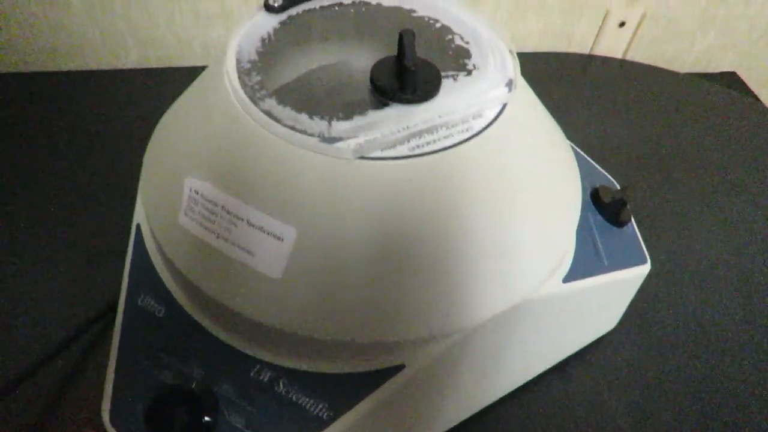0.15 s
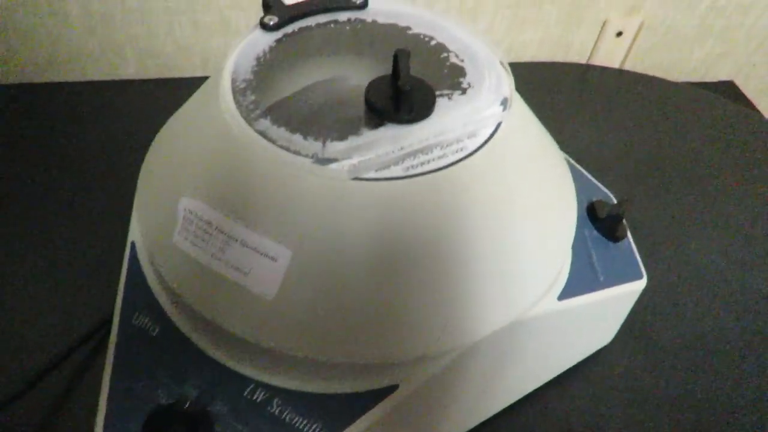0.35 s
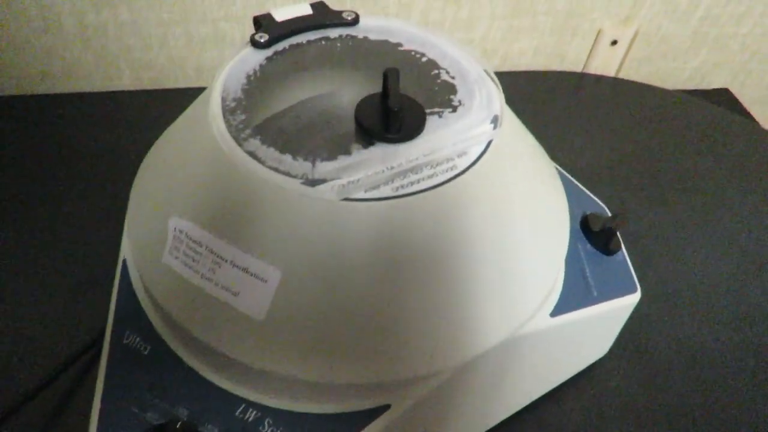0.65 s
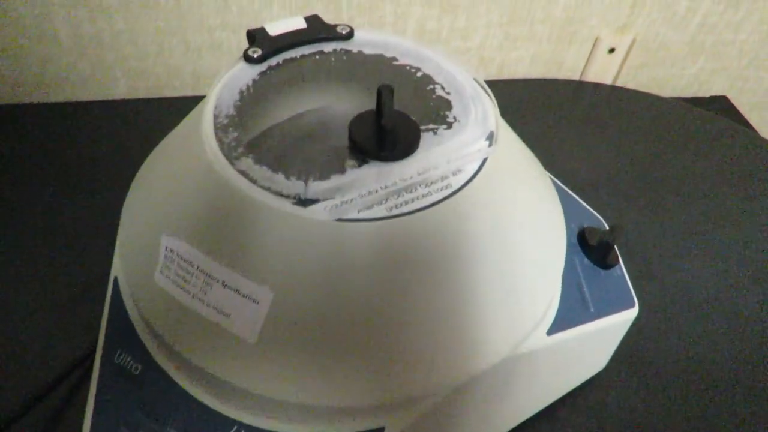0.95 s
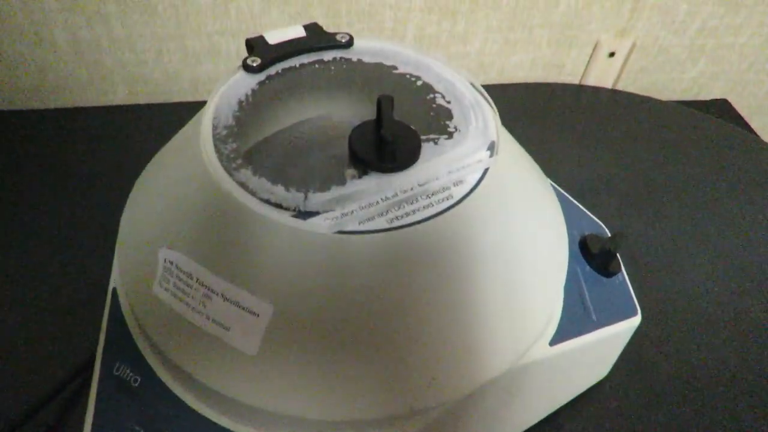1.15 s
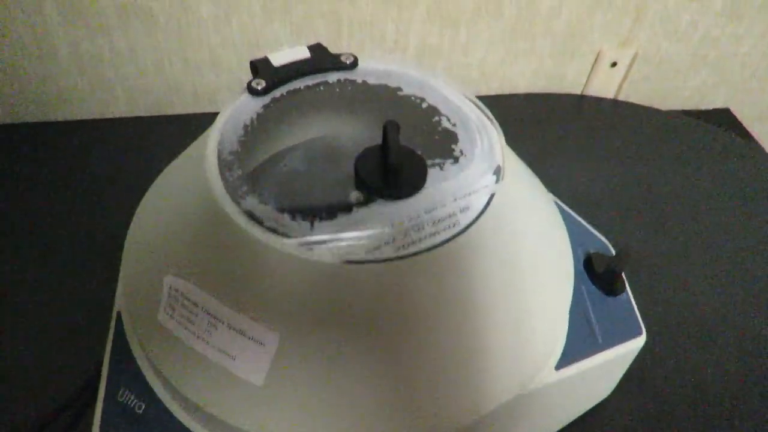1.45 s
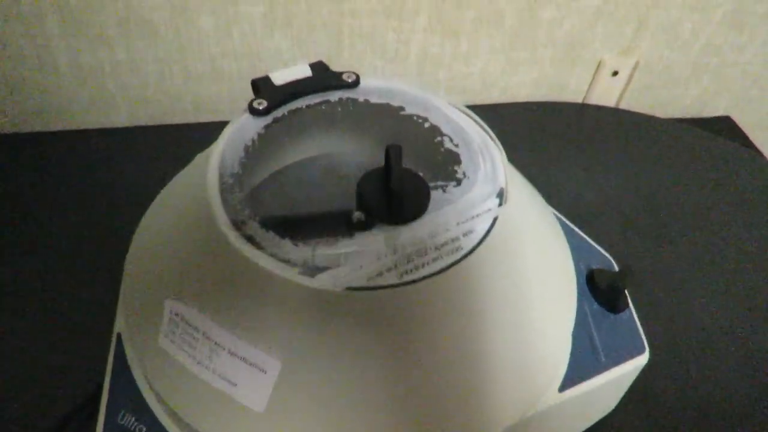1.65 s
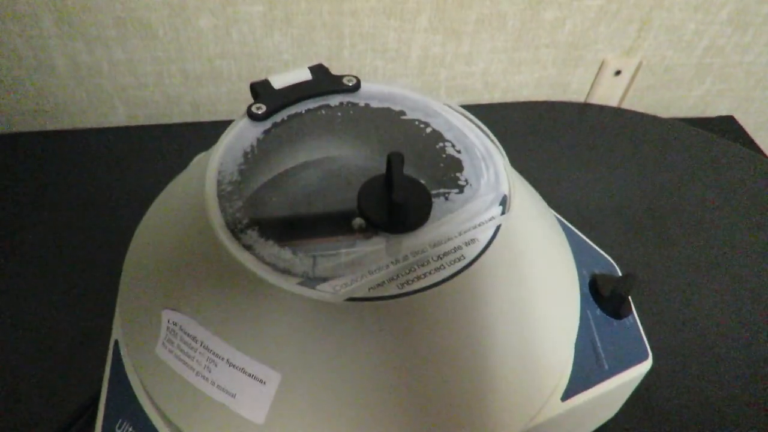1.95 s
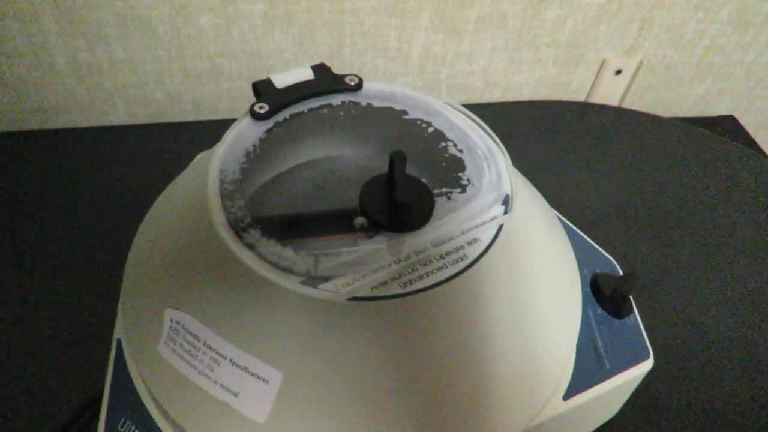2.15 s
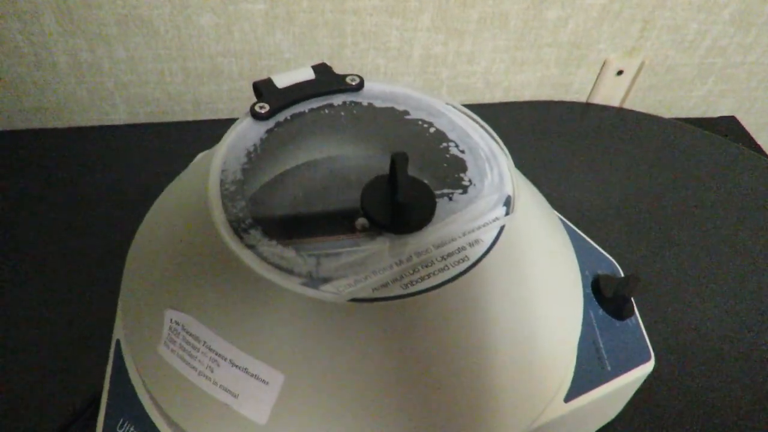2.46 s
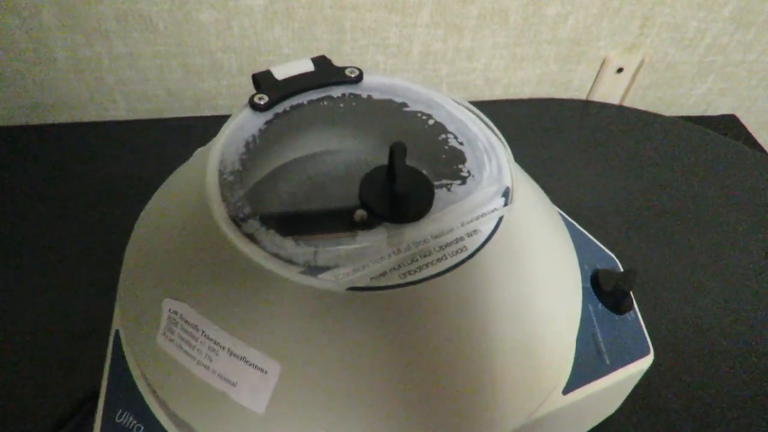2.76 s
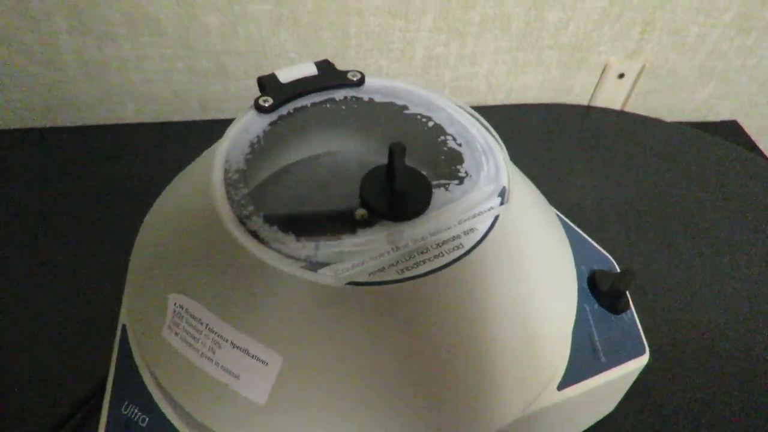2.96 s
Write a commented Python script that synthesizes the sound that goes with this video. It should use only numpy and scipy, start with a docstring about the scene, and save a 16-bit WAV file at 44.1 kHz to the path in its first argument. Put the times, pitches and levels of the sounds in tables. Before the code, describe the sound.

A small centrifuge runs steadily on a table indoors, low hum and rushing air with thin high whines; its clockwork timer ticks about four times a second while the close camera's lens drive clicks in irregular bursts.

```python
"""Indoors, on a table: a small benchtop centrifuge runs with a steady hum, air rushing in its plastic
housing (shaped noise) and thin whines (sines). Its clockwork timer goes tick-tock: struck modes and a
rattle of noise. A camera's lens drive clicks: short struck modes.
Two channels: left is alike + opposed, right is alike - opposed. The bass is mostly alike; the high
treble is mostly opposed."""
import sys
import numpy as np
from scipy import signal
from scipy.fft import rfft, irfft
from scipy.io import wavfile
from scipy.ndimage import uniform_filter1d

SR = 44100
rng = np.random.default_rng(int(sys.argv[2]) if len(sys.argv) > 2 else 0)


def wav_out(sig):
    """Save sig, one row per channel (or a flat mono array), as 16-bit PCM at SR to the path in sys.argv[1]."""
    wavfile.write(sys.argv[1], SR, np.round(np.clip(np.atleast_2d(sig).T, -1, 1) * 32767).astype(np.int16))


N = 136710


def gain_of(db):
    """Amplitude factor of a level in dB."""
    return 10 ** (np.asarray(db) / 20)


def evened(x):
    """Scales to rms 1."""
    return x / np.sqrt(np.mean(x ** 2) + 1e-20)


def read(points, hz, column=1):
    """Reads a column of a spectrum on a log-frequency axis."""
    p = np.transpose(points)
    return np.interp(np.log(hz + 1), np.log(p[0] + 1), p[column])


def add(mix, start_s, sound):
    """Adds a sound into the mix, cut at the end."""
    part = mix[:, round(start_s * SR):][:, :sound.shape[1]]
    part += sound[:, :part.shape[1]]


def drift(top_hz):
    """Slow random wander of rms 1: sixteen sines up to top_hz, weaker as they quicken."""
    t = np.arange(0, N, 256) / SR
    slow = np.zeros(len(t))
    for hz in np.geomspace(top_hz / 20, top_hz, num=16):
        slow += np.sin(2 * np.pi * (hz * t + rng.random())) / np.sqrt(hz)
    return np.interp(np.arange(N) / SR, t, evened(slow))


def tone(hz, rms_db):
    """Sine of fixed or gliding pitch, with a random starting phase."""
    cycles = np.cumsum(hz * np.ones(N)) / SR + rng.random()
    return np.sqrt(2) * gain_of(rms_db) * np.sin(2 * np.pi * cycles)


RING_SAMPLES = 5000
STRIKE_S, MODE_SPREAD_DB = .0008, 2.5  # no two blows excite the modes alike


def ring(hz, t60_s, lag_s, alike_db, opposed_db):
    """A struck mode: soft start, exponential decay; the opposed part has its own phase."""
    t = np.maximum(np.arange(RING_SAMPLES) / SR - lag_s, 0)
    cycles = hz * t + rng.random((2, 1))
    start = 1 - np.exp(-(t / STRIKE_S) ** 2)
    level_db = np.array([[alike_db], [opposed_db]]) + MODE_SPREAD_DB * rng.standard_normal()
    return start * gain_of(level_db - 60 * t / t60_s) * np.sin(2 * np.pi * cycles)


# Air and motor noise, alike part. Each row: frequency in Hz, relative density in dB per Hz.
RUSH_ALIKE = [(76, -18), (130, -5), (201, -11.5), (260, -12), (374, -17.5), (482, -16), (669, -23.5),
              (789, -19), (864, -24), (1090, -24), (1760, -29), (2110, -29), (6520, -48), (8880, -57.5),
              (10100, -65.5), (13100, -101), (22000, -120)]
# The same noise, opposed part. Each row: frequency in Hz, relative density in dB per Hz.
RUSH_OPPOSED = [(35, -52.5), (60, -18), (85, -14), (109, -7), (320, -1.5), (422, -2), (546, -8.5),
                (875, -12), (1810, -18.5), (2300, -14.5), (2910, -23), (4280, -27), (6570, -33.5),
                (8200, -35.5), (10100, -31.5), (11500, -35.5), (12500, -35.5), (14200, -45), (15000, -63)]
# Resonances and dips of housing and table. Each row: frequency in Hz, width in Hz, lift in dB.
HOUSING_MODES = [(60.1, 8, 19.5), (73, 5, 13), (101, 34, -5.5), (145.6, 6.1, 7.5), (251.5, 8.6, 5),
                 (269.6, 12, 4), (322, 20, 4.5), (424.7, 24, 5), (485.7, 11, 7), (568, 25, 5.5),
                 (636, 12, 3.5), (754, 26, 1.5), (781, 39, 5), (890, 19, 3.5), (1103, 36, 4),
                 (2040, 160, 1)]
# Band louder in the left channel. One row: centre in Hz, width in octaves, share of the alike part.
LEFT_BAND = (330, .5, .06)
# Treble level, used about its mean. Each row: time in seconds, level in dB.
TREBLE_LEVEL = [(0.0, -60.5), (1.6, -63), (1.7, -62.5), (2.43, -63), (2.55, -60), (3.1, -63)]
# Growth of the rush from start to end. Each row: frequency in Hz, growth in dB.
RUSH_GROWTH = [(100, 2.5), (250, 0), (500, 1.5), (1200, 1.5), (3000, -0.5), (6000, 1.5)]
RUSH_ALIKE_DB, RUSH_OPPOSED_DB = -31, -47.5
RUMBLE_EDGE_HZ, TREBLE_EDGE_HZ = 39.7, 3500
PATCHY_RMS_DB, SWELL_RMS_DB, SWELL_TOP_HZ = 0.91, 0.91, 1.5


def rush():
    """Noise shaped by housing resonances, with faint time-frequency patches and a slow swell."""
    hz = np.fft.rfftfreq(N, 1 / SR)
    lift_db = sum(db / (1 + (2 * (hz - f) / width) ** 2) for f, width, db in HOUSING_MODES)
    low_cut = 1 / np.sqrt(1 + (RUMBLE_EDGE_HZ / (hz + 1)) ** 10)
    white = rfft(rng.standard_normal((2, N))) * low_cut
    alike = evened(irfft(white[0] * gain_of(read(RUSH_ALIKE, hz) + lift_db), N)) * gain_of(RUSH_ALIKE_DB)
    opposed = evened(irfft(white[1] * gain_of(read(RUSH_OPPOSED, hz)), N)) * gain_of(RUSH_OPPOSED_DB)

    centre_hz, width_octaves, share = LEFT_BAND
    lean = share * np.exp(-(np.log2((hz + 1) / centre_hz) / width_octaves) ** 2)
    opposed = opposed + irfft(rfft(alike) * lean, N)

    f, t, spectra = signal.stft([alike, opposed], SR, nperseg=1024)
    patches = uniform_filter1d(rng.standard_normal(spectra.shape[1:]), size=12, axis=0)
    patches = evened(uniform_filter1d(patches, size=5, axis=1))
    at_s, treble_db = np.transpose(TREBLE_LEVEL)
    treble_weight = 1 / (1 + (TREBLE_EDGE_HZ / (f + 1)) ** 4)
    change_db = np.outer(treble_weight, np.interp(t, at_s, treble_db - treble_db.mean()))
    change_db = change_db + PATCHY_RMS_DB * patches
    change_db = change_db + read(RUSH_GROWTH, f)[:, None] * (t * SR / N - .5)
    shaped = signal.istft(spectra * gain_of(change_db), SR, nperseg=1024)[1][:, :N]
    return shaped * gain_of(SWELL_RMS_DB * drift(SWELL_TOP_HZ))


# Lens drive clicks. Each row: time in seconds, level in dB.
LENS_CLICKS = [(0.0104, -32.5), (0.0443, -34), (0.0777, -34.5), (0.1112, -33.5), (0.1464, -42),
               (0.3112, -36), (0.3456, -36), (0.3804, -42), (0.4778, -31.5), (0.5117, -35), (0.545, -34),
               (0.7113, -32), (0.7437, -32), (0.7784, -29), (0.8154, -44), (0.9258, -47), (0.9737, -34),
               (1.4122, -33), (1.5424, -30), (1.6112, -35), (1.6781, -38), (1.944, -33), (2.0118, -36),
               (2.0787, -33), (2.5475, -31.5), (2.6134, -33.5), (2.6803, -32.5), (2.8165, -38),
               (2.879, -32), (2.9472, -30.5)]
# Modes of a click. Each row: nominal frequency in Hz, relative alike level in dB, relative opposed in dB.
LENS_MODES = [(3840, -6, -19), (4310, -0.5, -16.5), (4670, -0.5, -15), (5150, -2.5, -14), (5660, -11, -21),
              (2000, 0, -13), (2240, 0.5, -22), (2800, -4, -18), (3320, -10, -20), (1225, -4, -16.5)]
LENS_T60_CYCLES, LENS_LEAD_S, LENS_SMEAR_S = 34, .0012, .002  # modes start within the smear


def lens():
    """Short dull snaps inside the camera: modes that all die in the same number of nominal cycles."""
    out = np.zeros((2, N))
    for time_s, db in LENS_CLICKS:
        click = np.zeros((2, RING_SAMPLES))
        for f, alike_db, opposed_db in LENS_MODES:
            mode_hz, lag_s = f * rng.uniform(.95, 1.05), LENS_SMEAR_S * rng.random()
            click += ring(mode_hz, LENS_T60_CYCLES / f, lag_s, alike_db, opposed_db)
        add(out, time_s - LENS_LEAD_S, gain_of(db) * click)
    return out


# Escapement beats, tick and tock in turn. Each row: start in seconds, level in dB.
BEATS = [(0.1705, -44.5), (0.4406, -42.5), (0.6779, -43), (0.951, -44), (1.1882, -44.5), (1.4596, -42.5),
         (1.6945, -44.5), (1.9668, -43), (2.204, -44), (2.4762, -40.5), (2.7187, -45.5), (2.9868, -41)]
# Modes of the clockwork. Each row: nominal frequency in Hz, relative tick level in dB, relative tock
# level in dB, opposed level re alike in dB, longest t60 in seconds.
CLOCKWORK_MODES = [(2590, -9, 2.5, -18, .035), (3565, -11, -3.5, -17, 0.054), (4360, -3.5, -2, -16, 0.061),
                   (5214, -3.5, 0.5, -16, 0.051), (5840, -14, -14, -16, 0.036),
                   (6490, -8, -11.5, -13, 0.056), (7070, -12.5, -8, -9, 0.063),
                   (8090, -15.5, -10, -10.5, 0.052), (8400, -20, -17, -9.5, 0.039),
                   (9570, -11.5, -16.5, -3, 0.051)]
# Impacts within one beat. Each row: nominal lag in seconds, relative level in dB.
IMPACTS = [(0, 7), (.005, 1), (0.012, 1.5)]
# Rattle in the case. Each row: frequency in Hz, relative alike level in dB, relative opposed in dB.
RATTLE_SPECTRUM = [(2500, -13, -20.5), (4420, -2, -17), (7000, -6.5, -13), (9000, -8.5, -7.5),
                   (10100, -10, 4.5), (10500, -19, -10.5), (11900, -16, -10), (13500, -21, -21),
                   (15000, -38.5, -38.5)]
RATTLE_DB, RAGGED_RMS_DB, SECOND_BEAT_TOP_DB = 1.5, 3, 7
RATTLE_RISE_S, RATTLE_T60_S, TOP_T60_S = 0.0033, 0.15, 0.075  # the top of the rattle dies sooner


def timer():
    """Beats of quick impacts on modes and a ragged rattle, with more above 10.1 kHz on every second beat."""
    out = np.zeros((2, N))
    t, hz = np.arange(RING_SAMPLES) / SR, np.fft.rfftfreq(RING_SAMPLES, 1 / SR)
    rise = 1 - np.exp(-t / RATTLE_RISE_S)
    body_decay = rise * gain_of(-60 * t / RATTLE_T60_S)
    top_decay = rise * gain_of(-60 * t / TOP_T60_S)
    is_top = hz > RATTLE_SPECTRUM[4][0]
    colour = gain_of([read(RATTLE_SPECTRUM, hz, column=1), read(RATTLE_SPECTRUM, hz, column=2)])
    colour = colour * (hz > RATTLE_SPECTRUM[0][0] / 2)
    for k, (start_s, db) in enumerate(BEATS):
        is_second = k % 2
        wander = evened(uniform_filter1d(rng.standard_normal(len(t)), size=90))
        noise = gain_of(RAGGED_RMS_DB * wander) * rng.standard_normal((2, len(t)))
        body = rfft(body_decay * noise) * ~is_top
        top = rfft(top_decay * noise) * is_top * gain_of(SECOND_BEAT_TOP_DB * is_second)
        beat = gain_of(RATTLE_DB) * irfft((body + top) * colour)
        for f, tick_db, tock_db, opposed_db, t60_s in CLOCKWORK_MODES:
            mode_db = tock_db if is_second else tick_db
            for lag_s, impact_db in IMPACTS:
                mode_hz, mode_t60_s = f * rng.uniform(.95, 1.04), t60_s * rng.uniform(.5, 1)
                mode = ring(mode_hz, mode_t60_s, lag_s * rng.uniform(.6, 1.1), 0, opposed_db)
                beat = beat + mode * gain_of(impact_db + mode_db) / 2
        add(out, start_s, gain_of(db) * beat)
    return out


# Speed of the gliding whines above their slowest. Each row: time in seconds, excess in percent.
SPEED_EXCESS = [(0, .75), (.3, .48), (.5, .41), (1.0, .41), (1.35, .04), (1.6, 0), (2.6, .02), (2.85, .55),
                (3.1, .7)]
# Two whines one comb step apart trade places. Each row: time in seconds, upper level in dB, lower in dB.
TRADING_LEVELS = [(0, -72, -51.5), (.4, -63, -51), (.8, -62, -52), (.95, -62, -55), (1.1, -58, -71),
                  (1.3, -47, -64), (1.6, -45, -64), (2.0, -43.5, -66), (2.66, -44, -65), (2.73, -49.5, -74),
                  (2.9, -52.5, -53.5), (3.1, -52.5, -58)]
# Separate whines. Each entry: frequency at slowest speed in Hz.
SEPARATE_HZ = [1653.6, 2056.6, 2136]
# Their levels. Each row: mean alike level in dB, mean opposed level in dB.
SEPARATE_LEVELS = [(-63.5, -73), (-58.5, -68), (-60, -75)]
# Other whines of the comb. Each entry: distance from the upper whine in comb steps.
COMB_PLACES = [-4, 1, 4, 5, 6, 8, 9, 11]
# Their levels. Each row: mean alike level in dB, mean opposed level in dB.
COMB_LEVELS = [(-60, -78), (-56.5, -77), (-69, -79.5), (-67, -81), (-65, -79), (-71.5, -81), (-62, -85.5),
               (-69, -80)]
COMB_STEP_HZ, UPPER_HZ = 79.3, 2276.6  # at slowest speed
TRADE_OPPOSED_DB, WHINE_WAVER_RMS_DB = -24, 1.2  # opposed levels here and below are re alike
HUM_HZ, HUM_DB, HUM_OPPOSED_DB, HUM_WAVER_RMS_DB = 116.3, -29, -37.5, 0.44
STEADY_HZ, STEADY_DB, STEADY_OPPOSED_DB = 1079.3, -57, -18  # a faint whine that keeps its pitch


def motor():
    """Sines: hum and one whine of fixed pitch; the other whines glide together with the speed."""
    hum = tone(HUM_HZ, HUM_DB + HUM_WAVER_RMS_DB * drift(4.58))
    steady = tone(STEADY_HZ, STEADY_DB + WHINE_WAVER_RMS_DB * drift(1.6))
    out = hum * gain_of([[0], [HUM_OPPOSED_DB]]) + steady * gain_of([[0], [STEADY_OPPOSED_DB]])

    t = np.arange(N) / SR
    speed = 1 + np.interp(t, *np.transpose(SPEED_EXCESS)) / 100
    at_s, upper_db, lower_db = np.transpose(TRADING_LEVELS)
    for hz, curve_db in ((UPPER_HZ, upper_db), (UPPER_HZ - COMB_STEP_HZ, lower_db)):
        level_db = np.interp(t, at_s, curve_db)
        out = out + np.array([tone(hz * speed, level_db + db) for db in (0, TRADE_OPPOSED_DB)])

    whines_hz = SEPARATE_HZ + [UPPER_HZ + step * COMB_STEP_HZ for step in COMB_PLACES]
    for hz, levels_db in zip(whines_hz, SEPARATE_LEVELS + COMB_LEVELS):
        out = out + np.array([tone(hz * speed, db + WHINE_WAVER_RMS_DB * drift(2)) for db in levels_db])
    return out


def scene():
    """Sums the sources and turns alike and opposed into left and right."""
    alike, opposed = rush() + lens() + timer() + motor()
    return np.array([alike + opposed, alike - opposed])


BAND_EDGE_HZ = 15000


def record(dry):
    """Band limit: a linear-phase low-pass."""
    low_pass = signal.firwin(511, BAND_EDGE_HZ, window=("kaiser", 9), fs=SR)
    return signal.oaconvolve(dry, low_pass[None], "same")


dry = scene()
out = record(dry)
wav_out(out)
```